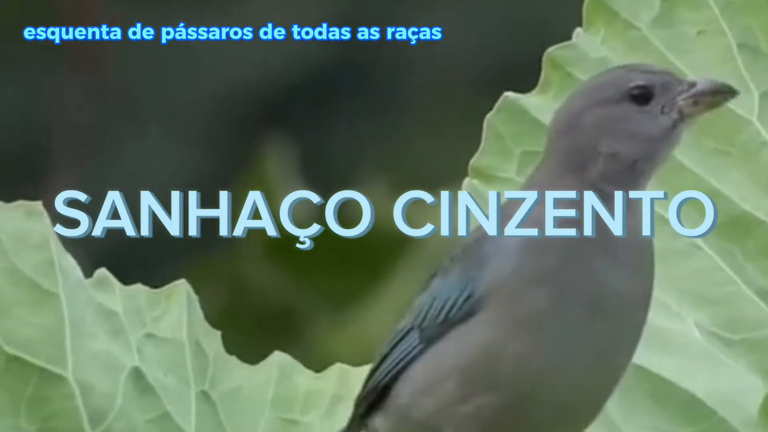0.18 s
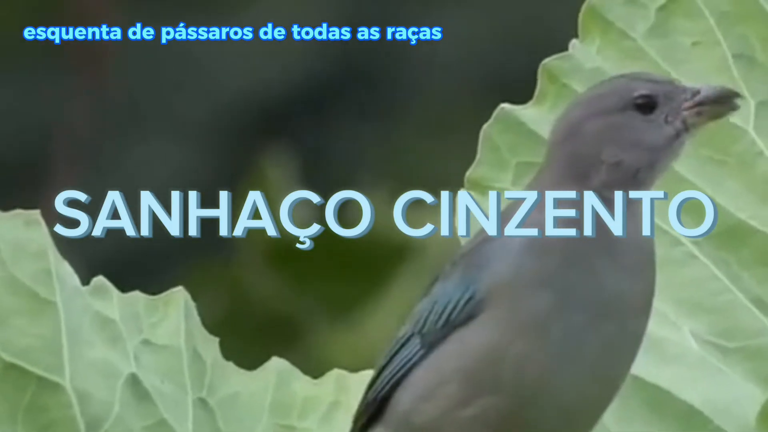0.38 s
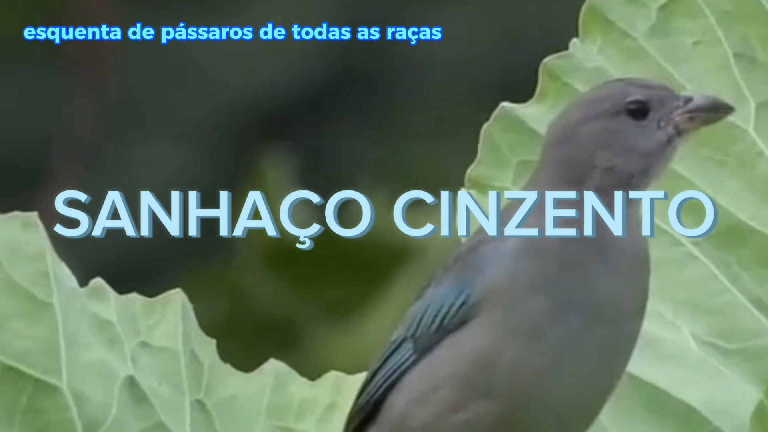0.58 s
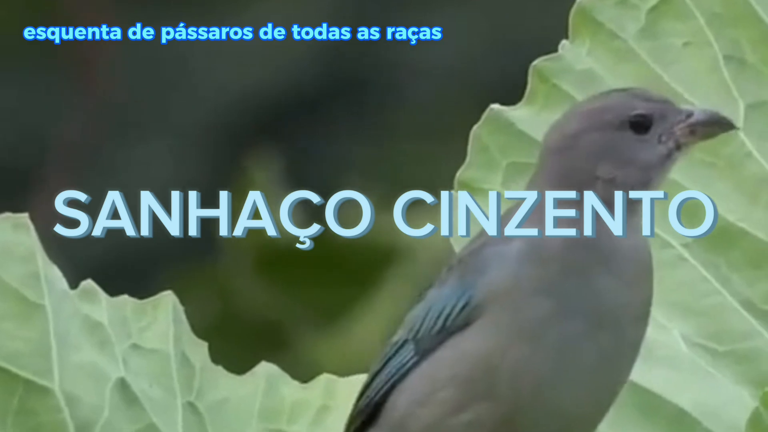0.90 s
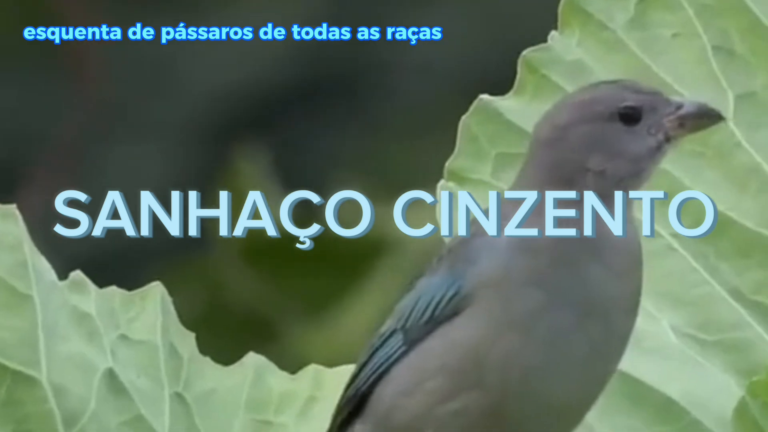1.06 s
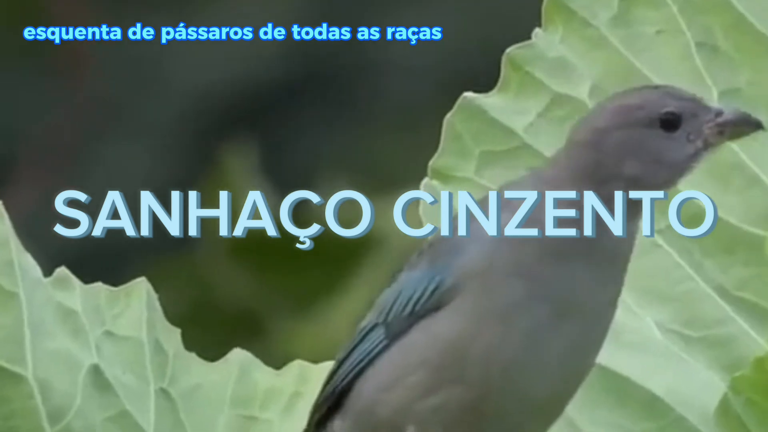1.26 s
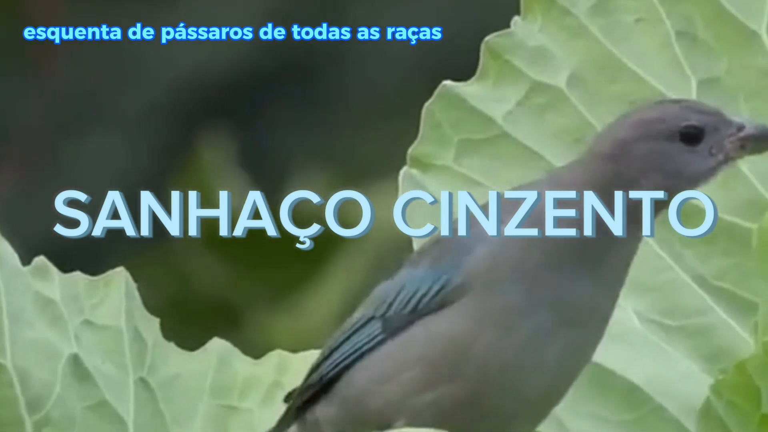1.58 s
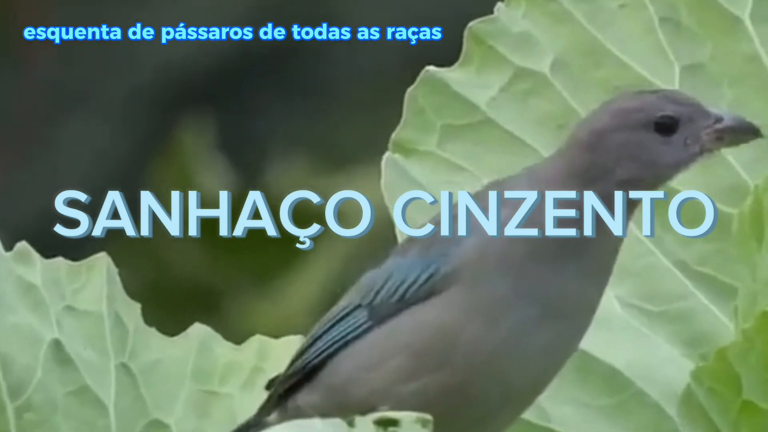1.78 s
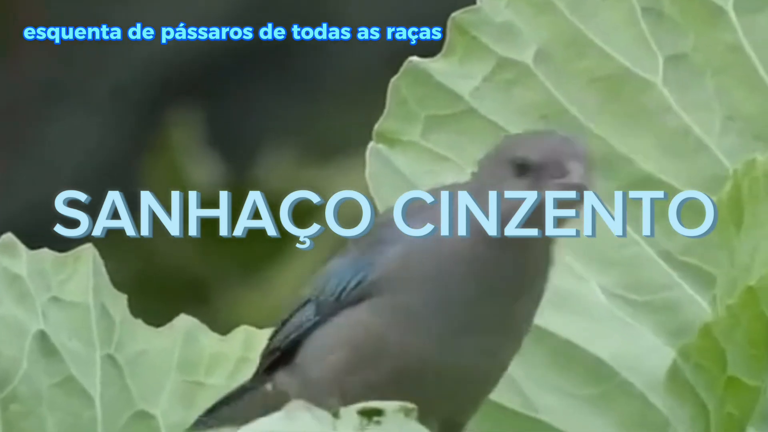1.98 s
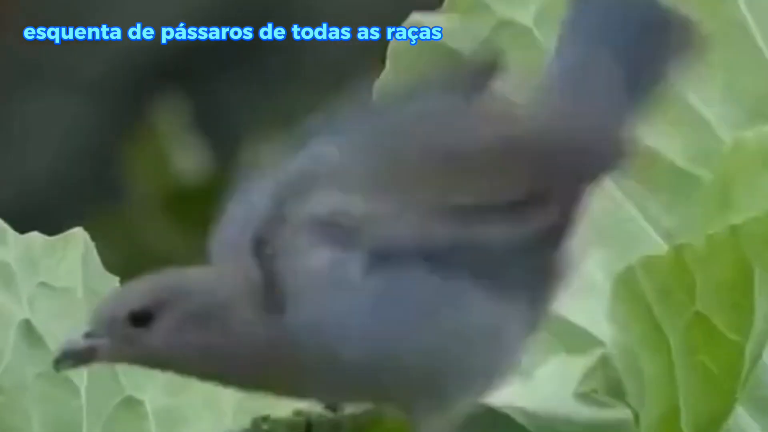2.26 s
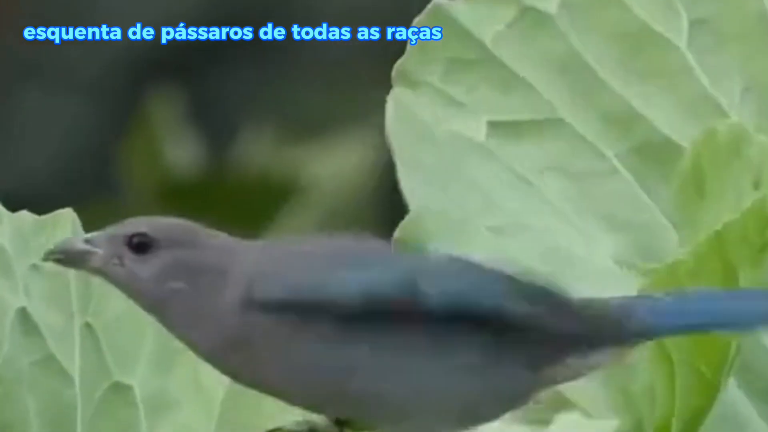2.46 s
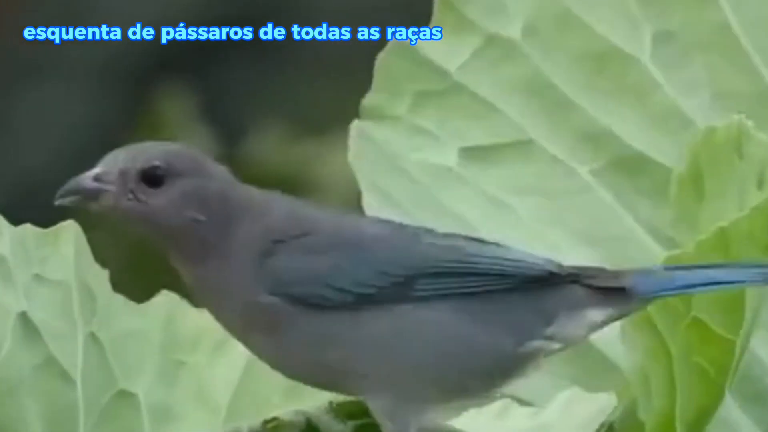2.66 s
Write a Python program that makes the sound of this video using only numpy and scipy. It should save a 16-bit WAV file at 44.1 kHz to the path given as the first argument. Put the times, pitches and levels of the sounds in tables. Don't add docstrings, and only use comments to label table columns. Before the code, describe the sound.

A small songbird close by sings quick squeaky twitters and gliding high whistles over faint rumble

```python
import sys
import numpy as np
from scipy import signal
from scipy.fft import rfft, irfft, next_fast_len
from scipy.io import wavfile
from scipy.ndimage import uniform_filter1d, map_coordinates

SR = 44100
rng = np.random.default_rng(int(sys.argv[2]) if len(sys.argv) > 2 else 0)


def nominal_scale(level):
    x = np.asarray(level, float) / 20
    return 10 ** x


def store_pcm(level_fs):
    pcm = np.round(np.clip(level_fs, -1, 1) * 32767).astype(np.int16)
    wavfile.write(sys.argv[1], SR, np.atleast_2d(pcm).T)


N = 123480

TOP_HZ = 15950
OVERTONE_DB = -25


def unit(x):
    return x / np.sqrt(np.mean(x ** 2) + 1e-20)


def along(points, hz):
    point_hz, value = np.transpose(points)
    return np.interp(np.log(hz + 1), np.log(point_hz + 1), value)


def wobble(rate):
    knots = rng.standard_normal(int(N * rate / SR) + 4)
    return map_coordinates(knots, [np.arange(N) * rate / SR])


def filtered(x, response):
    m = next_fast_len(N + 8192)
    return irfft(rfft(x, m) * response(np.fft.rfftfreq(m, 1 / SR)), m)[..., :N]


def gate(t0, t1, edge_s):
    t = np.arange(N) / SR
    nearest_end = np.minimum(t - t0, t1 - t)
    return np.sin(np.pi / 2 * np.clip(nearest_end / edge_s, 0, 1)) ** 2


def note(rows, edge_s=0.0017, rasp=0., flutter=1):
    flutter_db, waver_hz = 2, 12.4
    higher_db = (-18, -17.5, -31.5)
    s, hz, db, *octave = np.transpose(rows)
    t = np.arange(N) / SR
    part = slice(max(int(s[0] * SR), 0), int(s[-1] * SR) + 1)
    pitch = (np.interp(t, s, hz) + flutter * waver_hz * wobble(120))[part]
    turn = 2 * np.pi * np.cumsum(pitch) / SR
    octave_db = octave[0] if octave else db + OVERTONE_DB
    low = np.interp(t[part], s, db)
    up = np.interp(t[part], s, octave_db)
    tone = nominal_scale(low) * np.sin(turn) + nominal_scale(up) * np.sin(2 * turn)
    for k, high_db in enumerate(higher_db, start=3):
        level = nominal_scale(np.maximum(low, up) + high_db)
        tone = tone + level * np.sin(k * turn) * (k * pitch < TOP_HZ)
    tremble = nominal_scale(flutter * flutter_db * wobble(90))
    shape = gate(s[0], s[-1], edge_s) * tremble * (1 + rasp * wobble(1500))
    return np.sqrt(2) * np.pad(tone, (part.start, N))[:N] * shape


def chip(s, length, hz0, hz1, db, over_db, edge_s, rasp=0.):
    bend, fade_db = 1.05, 4
    middle_hz = np.sqrt(hz0 * hz1) / bend
    end_db = db - fade_db
    rows = [(s, hz0, db, db + over_db),
            (s + length / 2, middle_hz, db, db + over_db),
            (s + length, hz1, end_db, end_db + over_db)]
    return note(rows, edge_s, rasp)


def whistles():
    # start_s, pitch_hz, level_db
    arch_curve = [(0.612, 5790, -34.5), (0.63, 5852, -15.5), (0.682, 6114, -12), (0.725, 6680, -16.5),
                  (0.775, 6882, -16), (0.81, 6445, -15), (0.856, 5640, -14), (0.886, 4995, -14.5),
                  (0.915, 3820, -35.5)]
    # start_s, pitch_hz, level_db
    catch_curve = [(.801, 6600, -18), (.805, 6550, -4), (.808, 6500, -16), (.8105, 6480, -9),
                   (.814, 6450, -20)]
    # start_s, pitch_hz, level_db
    climb_curve = [(1.145, 3980, -31.5), (1.16, 4300, -24.5), (1.177, 4553, -31.5), (1.185, 4644, -11.5),
                   (1.245, 4942, -18), (1.29, 5175, -13.5), (1.345, 5450, -17.5), (1.379, 5780, -12),
                   (1.414, 6505, -20.5)]
    # start_s, pitch_hz, level_db
    level_curve = [(1.691, 6100, -24), (1.7, 6170, -17), (1.735, 6230, -12), (1.748, 6200, -16),
                   (1.753, 6150, -26), (1.76, 6150, -18), (1.78, 5900, -29), (1.802, 5600, -36)]
    return sum(note(rows, rasp=.06) for rows in (arch_curve, catch_curve, climb_curve, level_curve))


def held_note():
    # start_s, pitch_hz, level_db
    hold_curve = [(1.961, 5130, -38.5), (1.989, 5084, -16.5), (2.012, 4997, -19), (2.039, 4915, -9),
                  (2.07, 4895, -12), (2.119, 4915, -12), (2.138, 4939, -16), (2.164, 4943, -18),
                  (2.177, 4915, -31)]
    octave_db = -34
    rows = [(*row, row[-1] + octave_db) for row in hold_curve]
    return note(rows, flutter=0.096)


def squeaks():
    # start_s, pitch_hz, level_db, octave_db
    rise_curve = [(1.0, 2754, -42, -50), (1.012, 2822, -32, -30), (1.03, 3050, -35, -17),
                  (1.042, 3090, -32, -13), (1.05, 3130, -31, -20), (1.056, 3220, -30, -12),
                  (1.064, 3400, -31, -32), (1.09, 3660, -27, -50)]
    # start_s, pitch_hz, level_db
    twin_curve = [(.712, 6600, -26), (0.731, 6940, -22.5), (.79, 6600, -23.5), (0.804, 6360, -31.5)]
    # start_s, pitch_hz, level_db
    scoop_curve = [(.338, 4100, -42), (.352, 4500, -30), (.369, 4600, -28), (.385, 5300, -20),
                   (.398, 5800, -23), (.407, 5400, -29)]
    # start_s, pitch_hz, level_db, octave_db
    slide_curve = [(.49, 4300, -30, -60), (.499, 4420, -21, -55), (.511, 4150, -28, -60),
                   (.522, 3800, -27, -60), (.54, 3620, -30, -60)]
    # start_s, pitch_hz, level_db, octave_db
    hook_curve = [(1.535, 3900, -34, -55), (1.546, 4050, -27, -50), (1.554, 3050, -28, -28),
                  (1.562, 2350, -30, -25), (1.575, 2400, -32, -28)]
    # start_s, pitch_hz, level_db, octave_db
    arc_curve = [(.066, 3600, -44, -54), (.075, 4150, -38, -48), (.085, 4250, -35, -47),
                 (.091, 3200, -37, -46), (.097, 2000, -44, -52)]
    # start_s, pitch_hz, level_db, octave_db
    lift_curve = [(.453, 2000, -41, -48), (.462, 2150, -35, -40), (.475, 2250, -35, -39),
                  (.484, 2850, -34, -42), (.491, 4100, -46, -55)]
    # start_s, pitch_hz, level_db, octave_db
    leap_curve = [(1.577, 2720, -36, -28), (1.583, 2850, -30, -17), (1.592, 3020, -28, -11),
                  (1.6, 3130, -28, -17), (1.608, 3260, -28, -14), (1.613, 3250, -30, -24)]
    curves = (rise_curve, twin_curve, scoop_curve, slide_curve, hook_curve, arc_curve, lift_curve, leap_curve)
    return sum(note(rows, rasp=.25) for rows in curves)


def sagging_call():
    # start_s, pitch_hz, level_db, octave_db
    sag_curve = [(2.342, 3850, -42, -80), (2.365, 3850, -26, -70), (2.39, 3780, -29, -70),
                 (2.415, 3630, -29, -70), (2.44, 3440, -29, -70), (2.47, 3400, -32, -70),
                 (2.495, 3250, -31, -70), (2.511, 3080, -29, -70), (2.53, 2600, -46, -80)]
    # start_s, pitch_hz, level_db
    descant_curve = [(2.412, 6800, -34), (2.45, 6780, -31), (2.47, 6720, -24), (2.482, 6650, -27),
                     (2.497, 6400, -17), (2.51, 6000, -19), (2.516, 5700, -28), (2.534, 5150, -36)]
    return sum(note(rows, rasp=.07, flutter=1.4) for rows in (sag_curve, descant_curve))


def chips():
    # start_s, length_s, from_hz, to_hz
    single_rows = [(.204, .034, 6800, 4700), (.222, .055, 7400, 4600), (.278, .02, 4600, 4400),
                   (.253, .028, 3050, 2500), (.37, .032, 4900, 6900), (.25, .016, 8600, 8200),
                   (.205, .016, 7100, 7700), (.133, .026, 2750, 2400), (.139, .018, 2200, 1600),
                   (0, .014, 2800, 2350), (0, .014, 7900, 8600), (.536, .01, 6000, 4800),
                   (.537, .01, 3200, 2000), (1.611, .018, 3550, 3750), (1.634, .024, 3850, 3200),
                   (1.606, .011, 8900, 7400), (1.621, .016, 7950, 7850), (1.627, .007, 6500, 5300),
                   (1.738, .065, 7450, 7350), (2.328, .016, 5800, 6300), (2.709, .025, 6200, 4300),
                   (2.719, .017, 6400, 5500), (2.736, .014, 6400, 5800), (2.724, .022, 3400, 2300),
                   (2.735, .036, 5100, 4600), (2.75, .012, 2400, 2200)]
    single_db = [-19.5, -17.5, -29.5, -31, -19.5, -31.5, -25.5, -35.5, -36, -37, -41, -27, -35, -26, -30.5,
                 -24.5, -30, -22, -32, -46, -39, -37, -35.5, -36, -38.5, -36]
    # start_s, length_s, from_hz, to_hz
    double_rows = [
        (.118, .026, 3300, 2250),
        (2.313, .022, 2350, 2800),
        (2.748, .018, 3250, 2900),
    ]
    double_db = [-29.5, -40, -30]
    double_octave_db = [1, 0.5, 0]
    edge_share, rasp, breath_db = .3, .4, -8.5
    tones = np.zeros(N)
    for row, db in zip(single_rows, single_db):
        tones = tones + chip(*row, db, OVERTONE_DB, edge_share * row[1], rasp)
    for row, db, over_db in zip(double_rows, double_db, double_octave_db):
        tones = tones + chip(*row, db, over_db, edge_share * row[1], rasp)
    puffs = np.abs(signal.hilbert(tones)) * rng.standard_normal(N)
    breath = filtered(puffs, lambda f: f ** 4 / (f ** 4 + 3900.0 ** 4))
    return tones + nominal_scale(breath_db) * breath


def buzz():
    # start_s, pitch_hz, level_db
    buzz_curve = [(1.718, 8260, -23), (1.733, 8400, -32), (1.744, 8430, -24.5), (1.787, 8200, -24),
                  (1.798, 7800, -19), (1.812, 7230, -18), (1.833, 7200, -14.5), (1.84, 6825, -19.5),
                  (1.867, 6720, -18), (1.873, 6620, -36.5)]
    rate_hz, swing_hz, sharpness = 140, 150, 1.2
    scatter_db, rasp, octave_db = 1.6, .6, -5.5
    s, hz, db = np.transpose(buzz_curve)
    t = np.arange(N) / SR
    cycle = np.cumsum(rate_hz * (1 + 0.72 * wobble(70))) / SR % 1
    pitch = np.interp(t, s, hz) + swing_hz * np.sin(2 * np.pi * cycle)
    turn = 2 * np.pi * np.cumsum(pitch) / SR
    beats = unit(np.sin(np.pi * cycle) ** sharpness) * nominal_scale(scatter_db * wobble(170))
    tone = np.sqrt(2) * (np.sin(turn) + nominal_scale(octave_db) * np.sin(2 * turn))
    roughness = 1 + rasp * wobble(1200)
    return nominal_scale(np.interp(t, s, db)) * beats * roughness * tone * gate(s[0], s[-1], 0.005)


def snaps():
    # centre_time_s, centre_hz, length_s
    snap_rows = [(.004, 6000, .05), (.091, 6000, .008), (.135, 4000, .03), (.195, 8000, .015),
                 (.54, 4500, .006), (1.078, 7500, .03), (1.085, 6000, .005), (1.63, 6000, .003),
                 (1.52, 5000, .015), (1.615, 5000, .06), (2.33, 4500, .02), (2.52, 6000, .02),
                 (2.75, 5000, .04)]
    snap_db = [-37.5, -37.5, -31.5, -36.5, -29.5, -23.5, -32.5, -40, -34.5, -33.5, -47, -30, -32.5]
    width = 0.56
    t = np.arange(N) / SR
    total = np.zeros(N)
    for (s, centre_hz, length), db in zip(snap_rows, snap_db):
        noise = rng.standard_normal(N)
        burst = unit(filtered(noise, lambda f: np.exp(-.5 * (np.log((f + 1) / centre_hz) / width) ** 2)))
        total = total + nominal_scale(db) * burst * np.exp(-.5 * ((t - s) / (length / 2)) ** 2)
    return total


def bird():
    return whistles() + squeaks() + sagging_call() + chips() + buzz() + snaps()


def foliage(x, stretch, delay_s):
    # pitch_hz, fade_s
    fade_points = [(2000, 0.33), (5000, 0.2), (8000, 0.24)]
    # pitch_hz, level_db
    colour_points = [(2000, 2.5), (4000, 5), (5500, 0.5), (8000, 1.5)]
    rise_s = 0.0057
    hz, t, z = signal.stft(rng.standard_normal(SR), SR, nperseg=256)
    fade_s = stretch * along(fade_points, hz)[:, None]
    level_db = along(colour_points, hz)[:, None] - 60 * t / fade_s
    tail = signal.istft(z * nominal_scale(level_db), SR, nperseg=256)[1]
    tail = tail * (1 - np.exp(-np.arange(len(tail)) / (SR * rise_s)))
    delayed = np.pad(x, (int(delay_s * SR), 0))
    return signal.fftconvolve(delayed, tail / np.linalg.norm(tail))[:N]


def dove():
    # start_s, length_s, from_hz, to_hz, level_db
    coo_rows = [
        (1.303, 0.17, 759, 689, -54.5),
        (1.533, 0.14, 771, 708, -46),
        (1.745, .17, 681.6, 661, -48),
        (2.55, 0.088, 774.6, 749, -47.5),
        (2.705, 0.072, 726, 753, -51),
    ]
    coos = sum(chip(*row, -50.5, 0.026, 0.55) for row in coo_rows)
    return 0.93 * coos + 0.52 * foliage(coos, 0.97, 0.015)


def coloured_noise(points):
    return unit(filtered(rng.standard_normal(N), lambda f: nominal_scale(along(points, f))))


def background():
    # pitch_hz, level_db (per Hz)
    rumble_points = [(15, -71), (25, -32), (51, -6), (75, 3.5), (119, -10.5), (162, -7), (206, -20),
                     (300, -18.5), (390, -57.5), (660, -120)]
    # pitch_hz, level_db (per Hz)
    air_points = [(150, -15), (300, 0.5), (700, -3.5), (1000, -5.5), (2000, -13.5), (4000, -15.5),
                  (8000, -22.5)]
    # start_s, level_db
    swell_points = [(0, 2.5), (.3, 0.5), (0.698, 2), (2.201, -2), (2.499, 1.5), (2.8, 1)]
    rumble_db, air_db = -46, -51
    s, db = np.transpose(swell_points)
    swell = nominal_scale(np.interp(np.arange(N) / SR, s, db) + 1.6 * wobble(1.2))
    rumble = nominal_scale(rumble_db) * coloured_noise(rumble_points)
    air = nominal_scale(air_db) * coloured_noise([(80, -66)] + air_points + [(16000, -30)])
    return swell * (rumble + air)


def scene():
    near_db, near_delay_s = -6, 0.0065
    late_db, late_delay_s, late_stretch = -17, 0.042, 1.53
    song, held = bird(), held_note()
    sent = song + nominal_scale(-12) * held
    near = nominal_scale(near_db) * foliage(sent, 1, near_delay_s)
    late = nominal_scale(late_db) * foliage(song + held, late_stretch, late_delay_s)
    return (song + held + near + late + dove() + background())[None]


def band_limit(x):
    return signal.sosfilt(signal.butter(12, 15950, fs=SR, output="sos"), x)


def record(dry):
    shifts = (5512.5, 9646.9)
    split_hz, seam_hz = 8950, 12280
    rasp, blur, noise_share = .22, 0.42, 0.1
    most_db, copy_gain_db = -12, 1.5
    mask_db, mask_from_hz, hole_db = -56, 2600, -25

    rough = signal.hilbert(dry[0] * (1 + rasp * wobble(900)))

    def shifted(shift_hz):
        return np.real(rough * np.exp(2j * np.pi * shift_hz * np.arange(N) / SR))

    def stft(x):
        return signal.stft(x, SR, nperseg=1024, noverlap=768)[2]

    def power(z, size):
        over_pitch = uniform_filter1d(np.abs(z) ** 2, size=size, axis=0)
        return np.abs(uniform_filter1d(over_pitch, size=3, axis=1)) + 1e-16

    hz = np.fft.rfftfreq(1024, 1 / SR)[:, None]
    true = stft(dry[0])
    copy = np.where(hz < seam_hz, stft(shifted(shifts[0])), stft(shifted(shifts[1])))
    want = power(true, size=24)
    hiss = stft(rng.standard_normal(N))
    hiss_level = np.abs(hiss).mean()
    copy = copy * (1 + blur * stft(rng.standard_normal(N)) / hiss_level)
    copy = copy * np.minimum(np.sqrt(want / power(copy, size=24)), nominal_scale(most_db))
    missing = np.clip(want - 6 * power(copy, size=72), 0, None)
    copy = copy + noise_share * np.sqrt(missing) * hiss / hiss_level
    z = np.where(hz < split_hz, true, nominal_scale(copy_gain_db) * copy) * (hz < TOP_HZ)
    band = power(z, size=12)
    heard = band / (band.max(axis=0) * nominal_scale(2 * mask_db))
    keep = np.maximum(heard ** 3 / (1 + heard ** 3), nominal_scale(hole_db))
    keep = np.where(hz < mask_from_hz, 1, keep)
    mix = signal.istft(z * keep, SR, nperseg=1024, noverlap=768)[1][:N]
    return band_limit(mix[None])


dry = scene()
out = record(dry)
store_pcm(out)
```